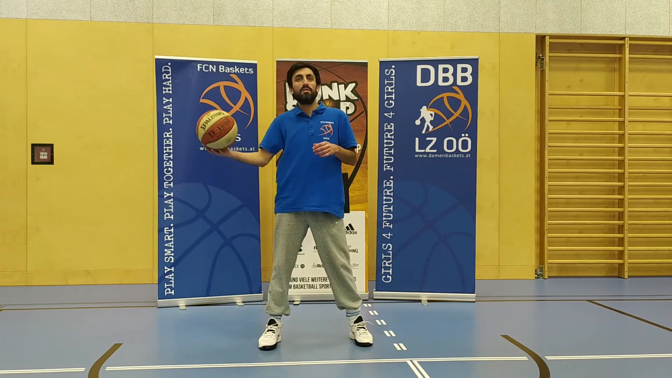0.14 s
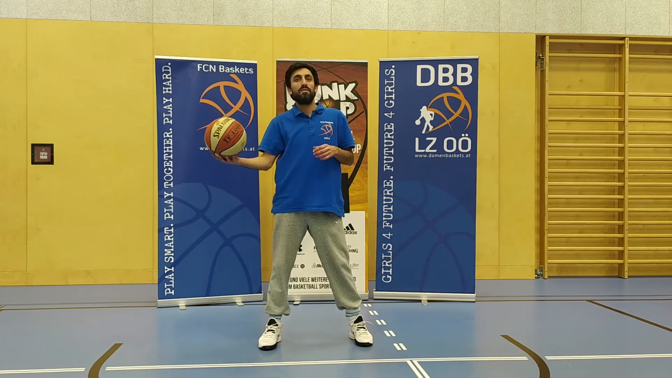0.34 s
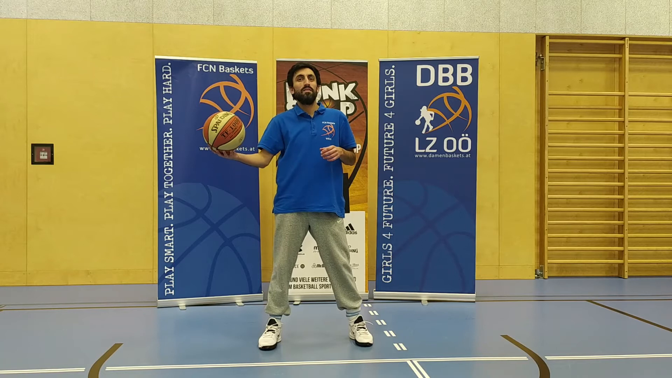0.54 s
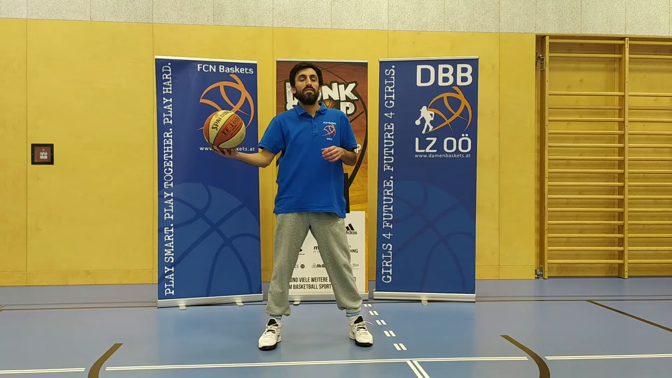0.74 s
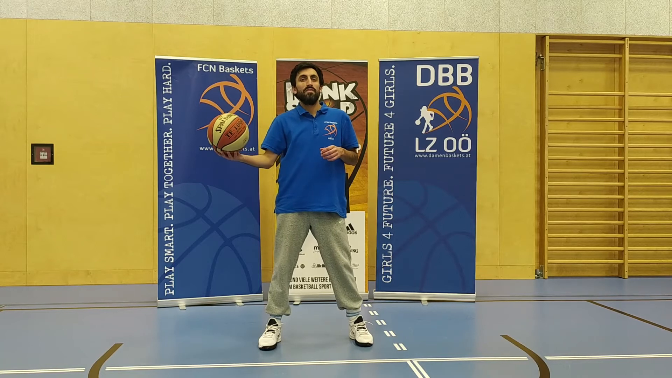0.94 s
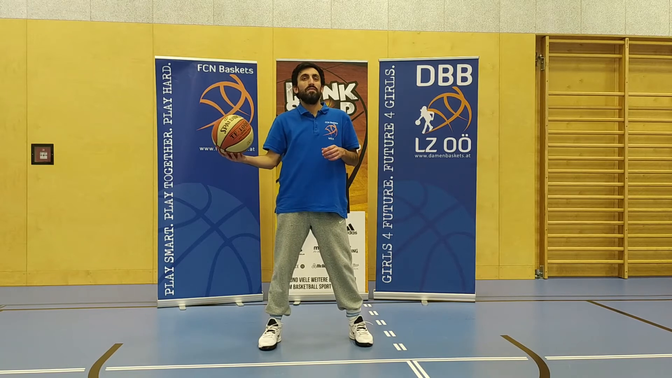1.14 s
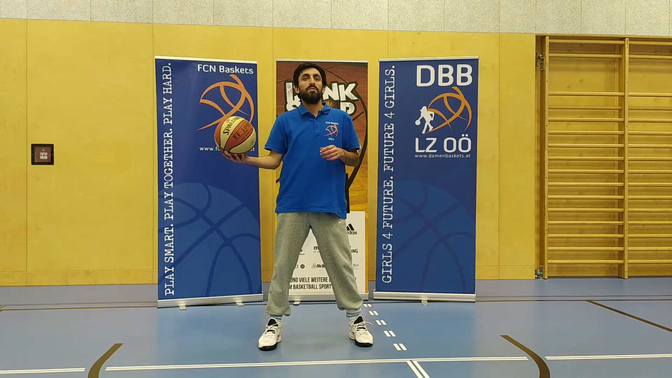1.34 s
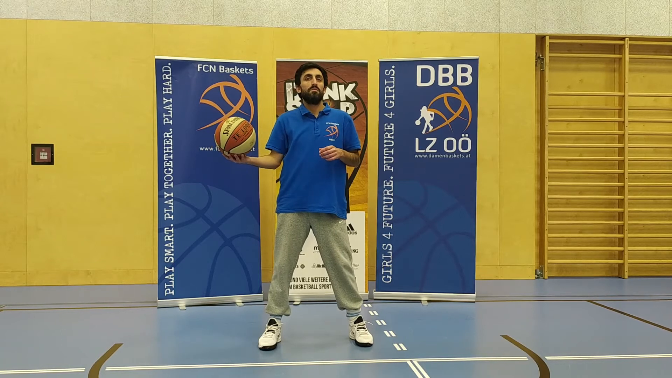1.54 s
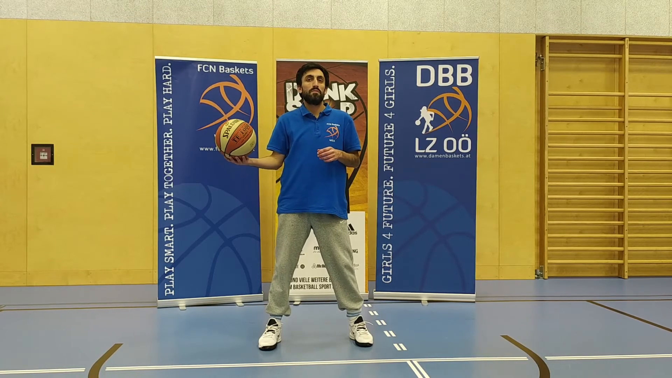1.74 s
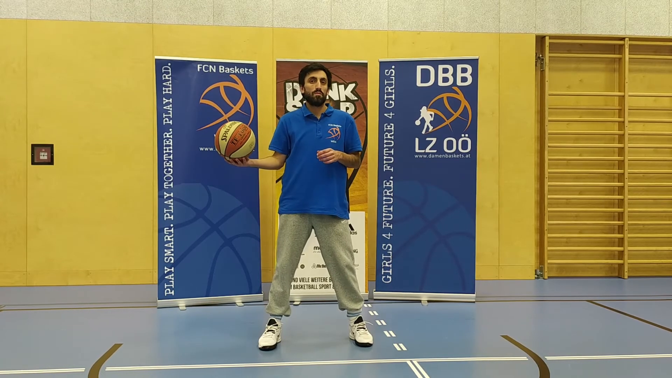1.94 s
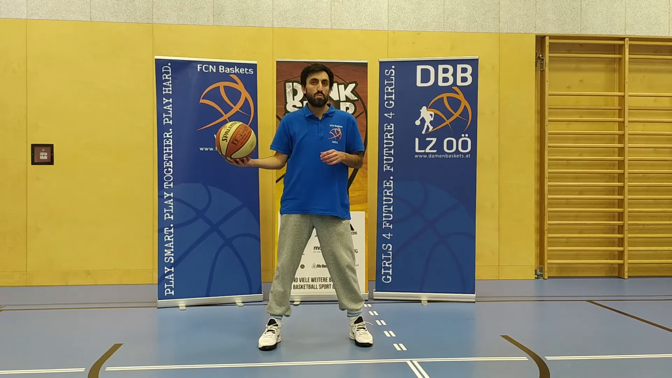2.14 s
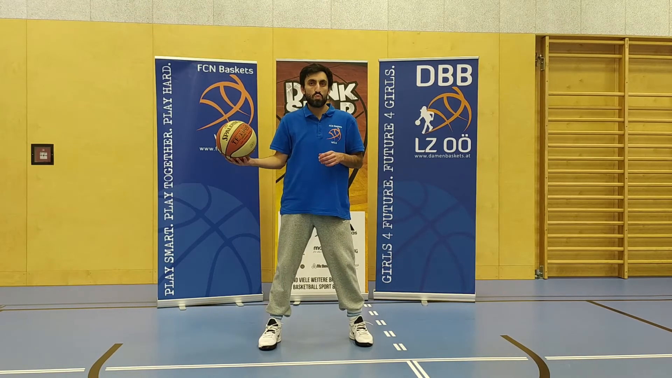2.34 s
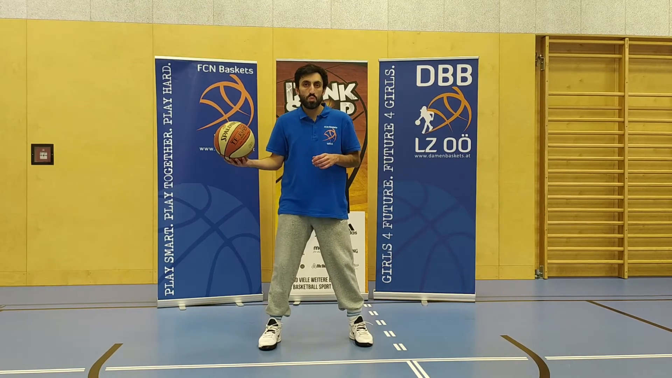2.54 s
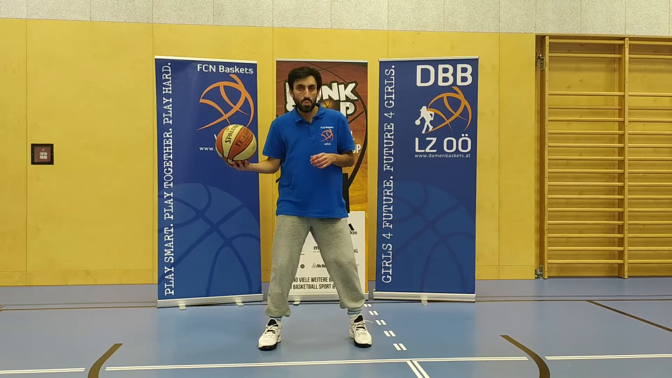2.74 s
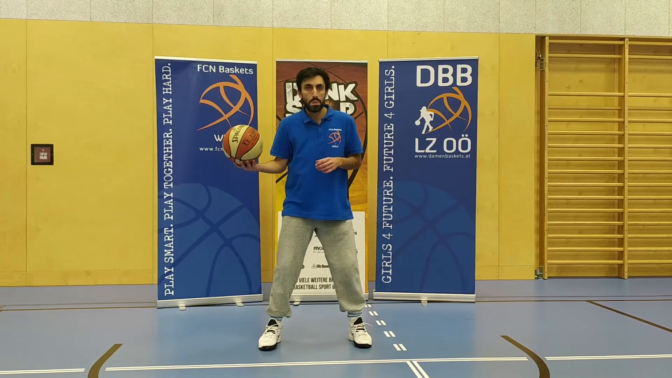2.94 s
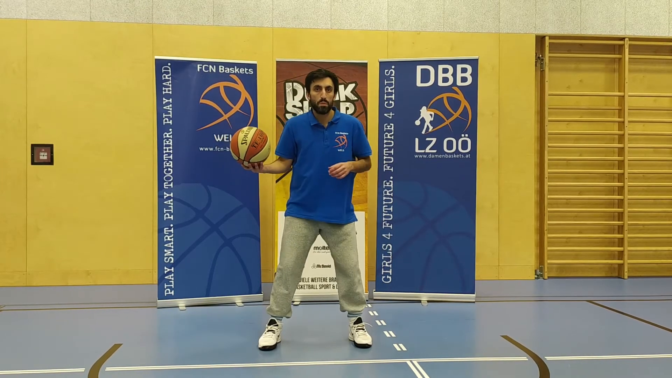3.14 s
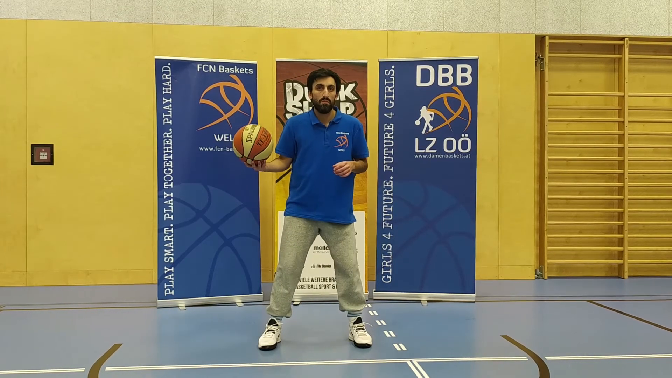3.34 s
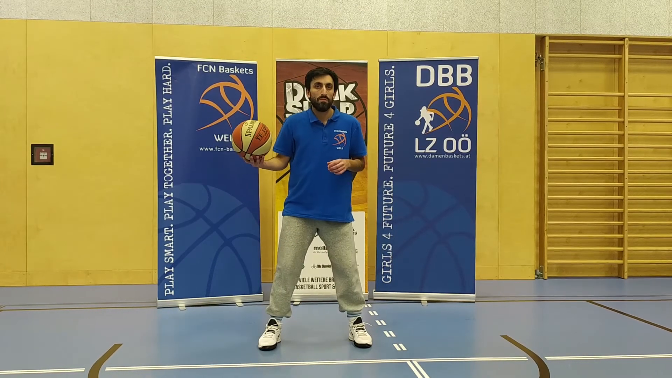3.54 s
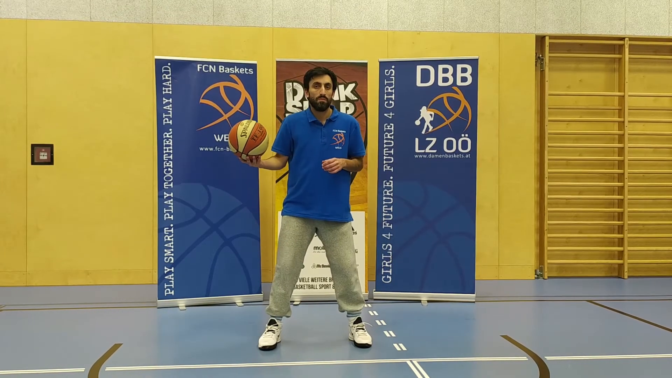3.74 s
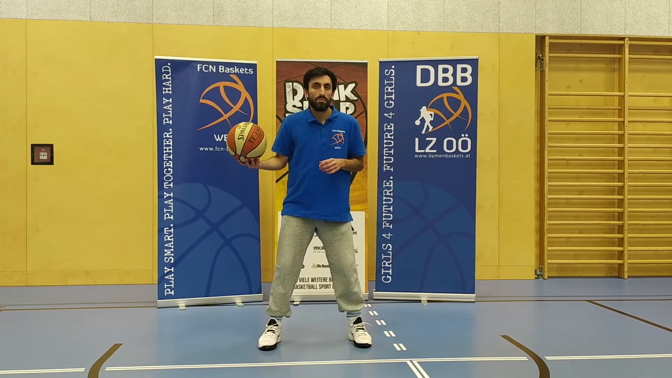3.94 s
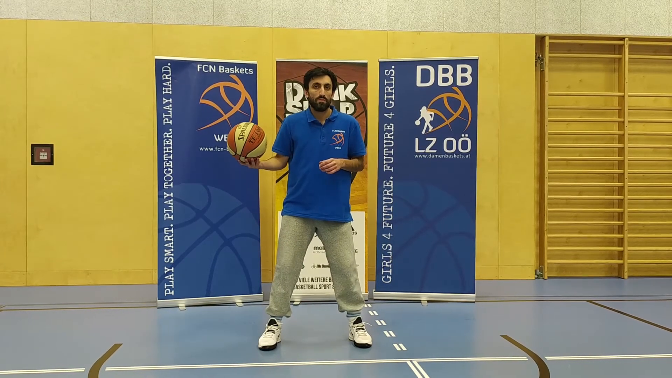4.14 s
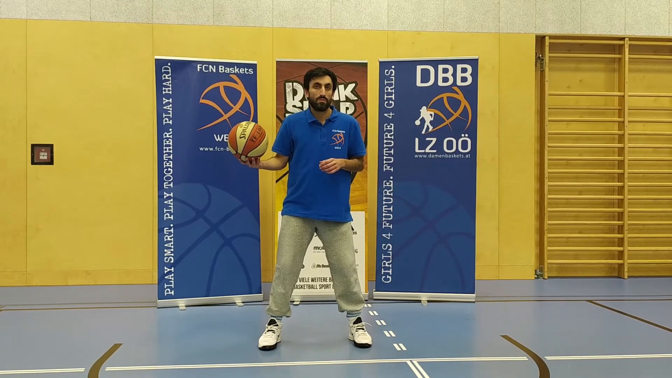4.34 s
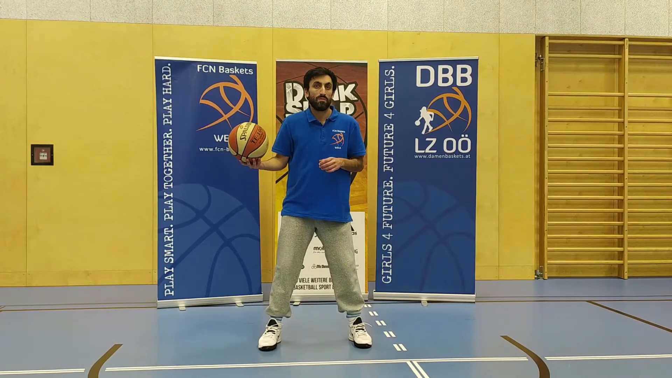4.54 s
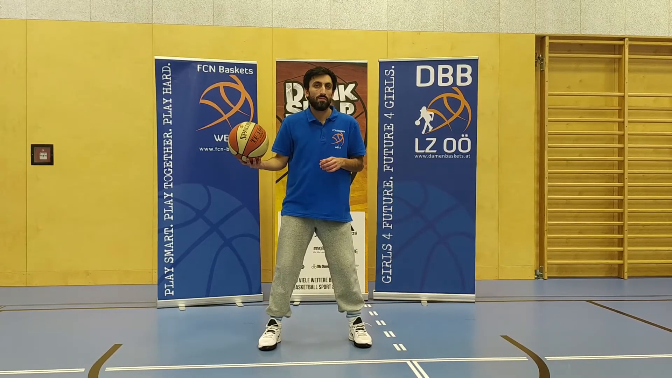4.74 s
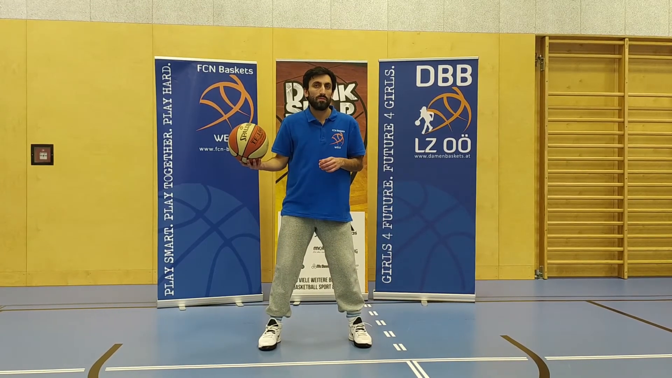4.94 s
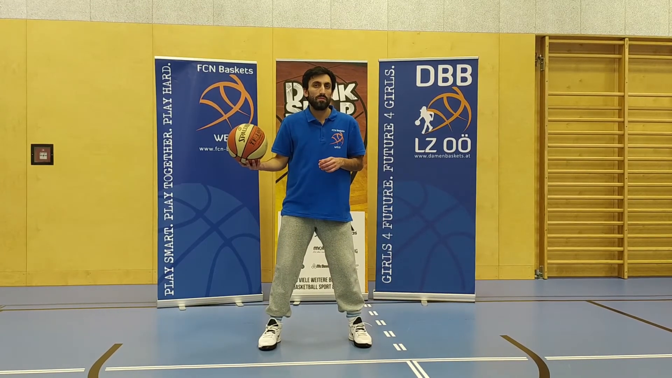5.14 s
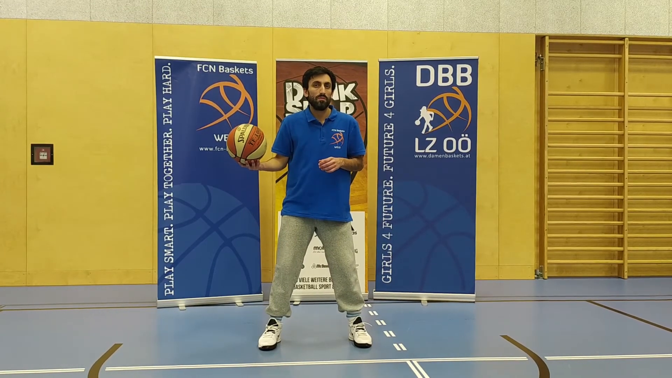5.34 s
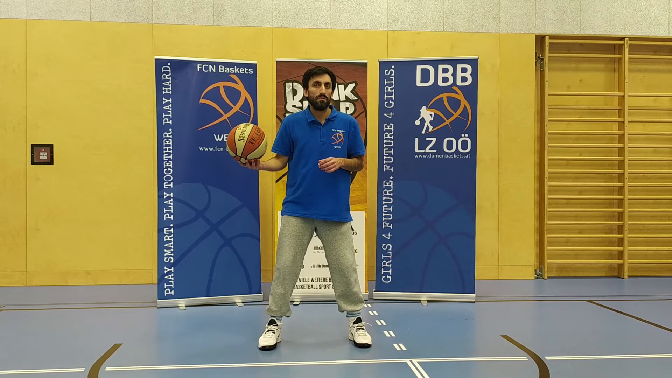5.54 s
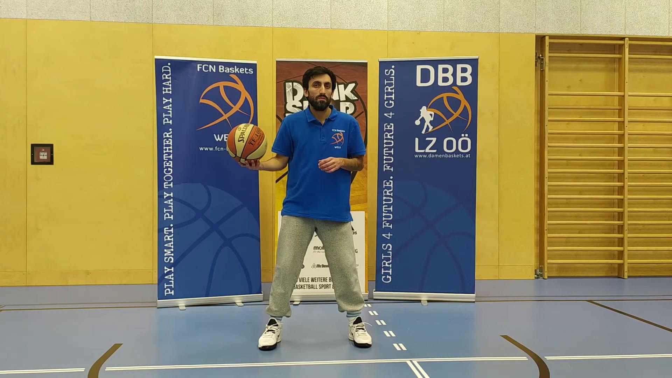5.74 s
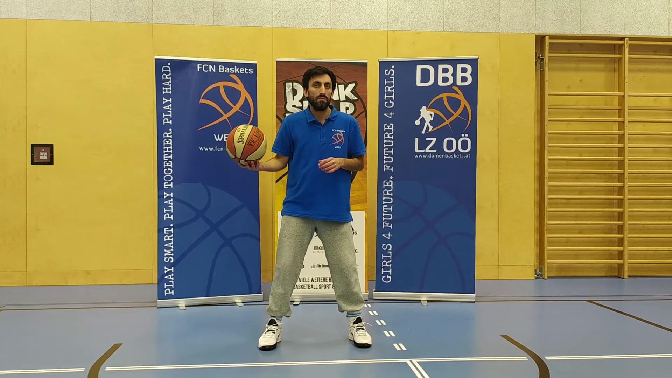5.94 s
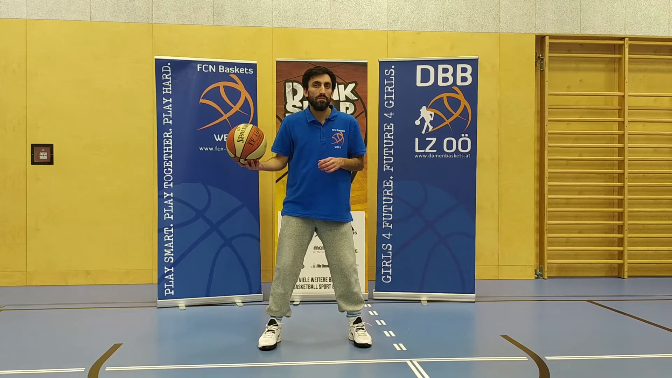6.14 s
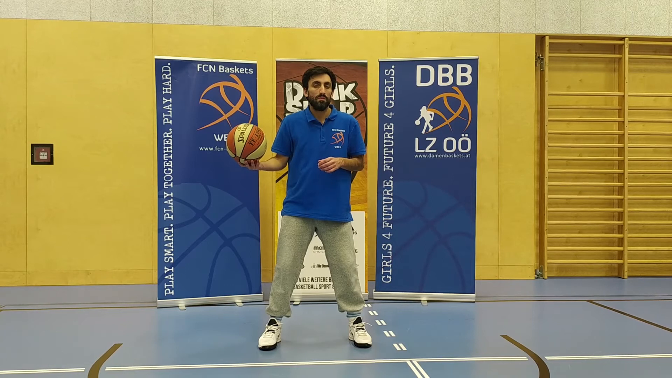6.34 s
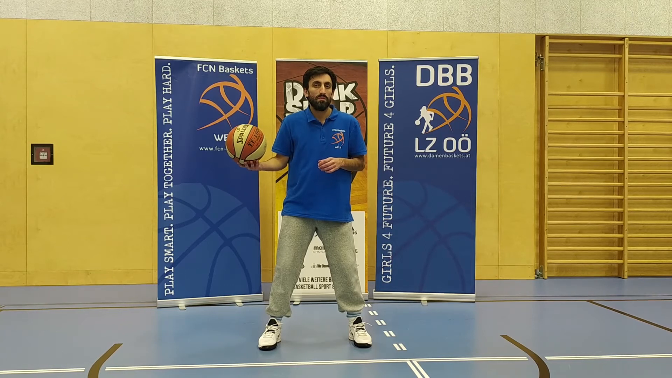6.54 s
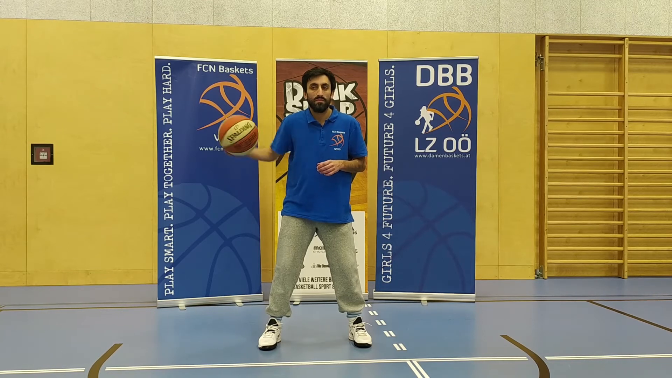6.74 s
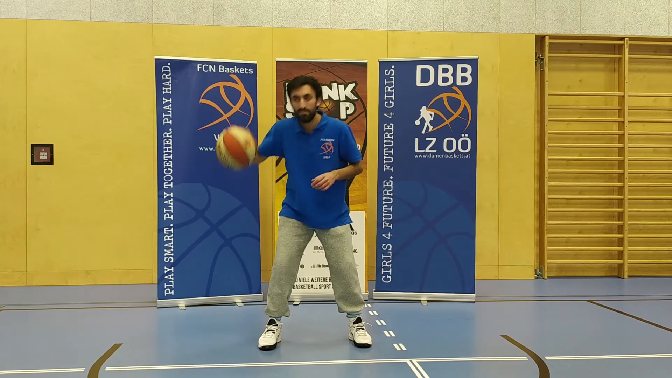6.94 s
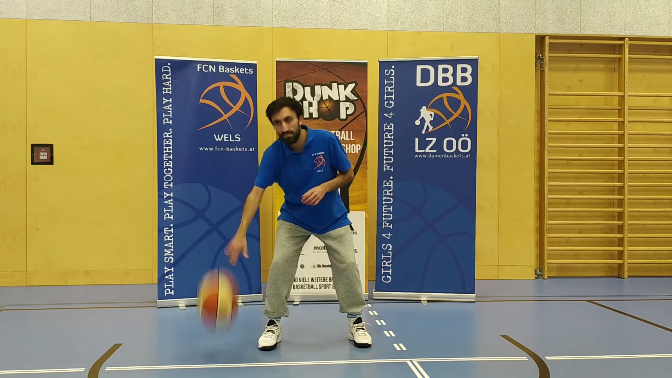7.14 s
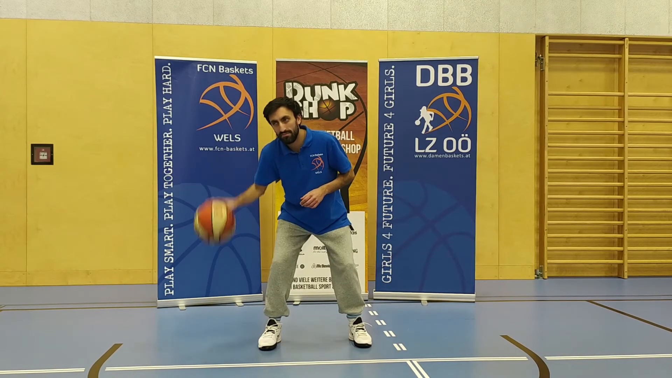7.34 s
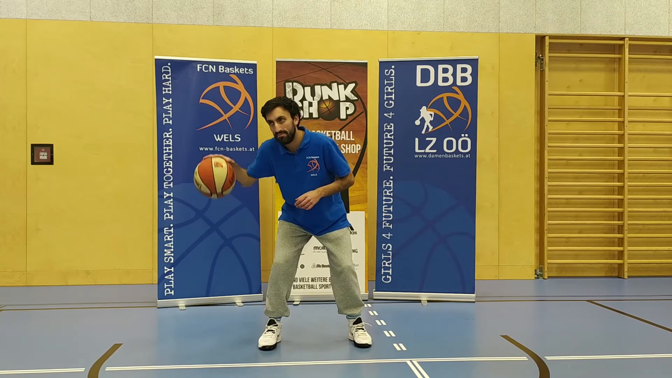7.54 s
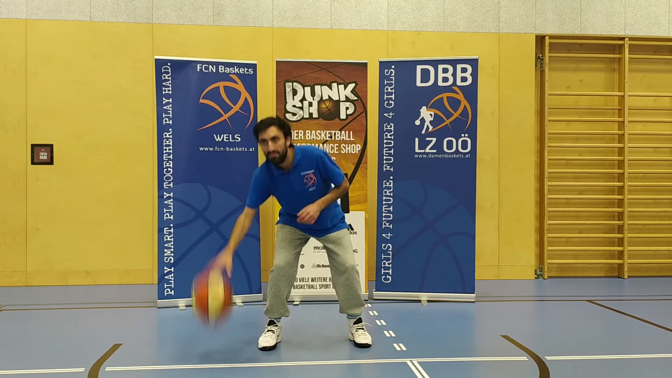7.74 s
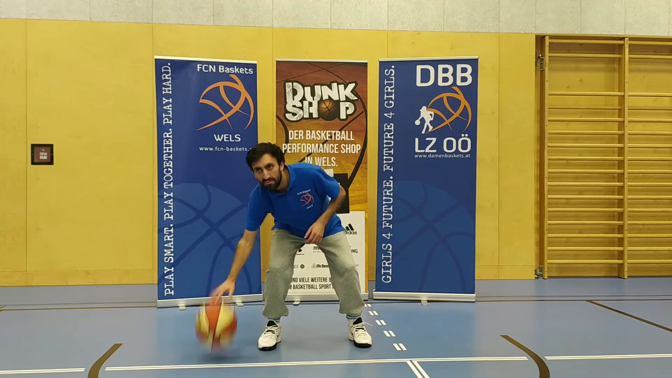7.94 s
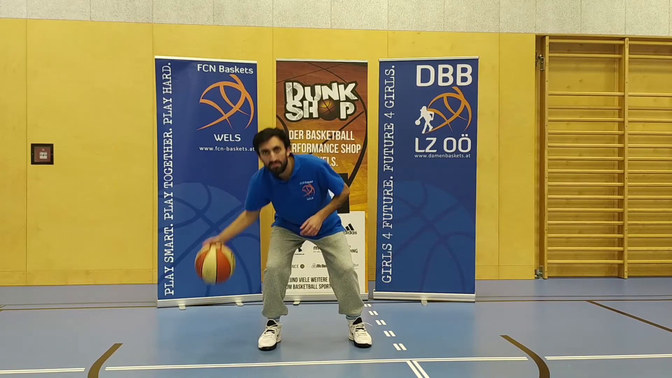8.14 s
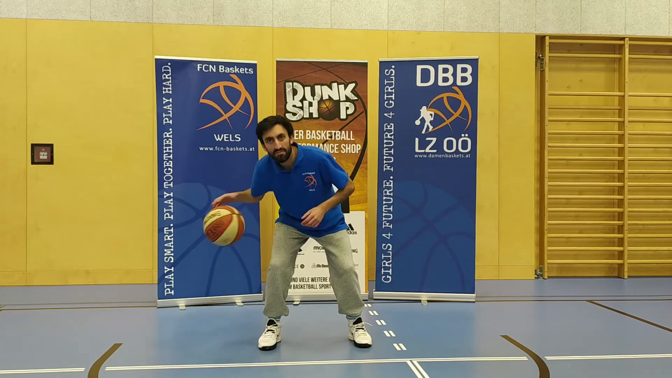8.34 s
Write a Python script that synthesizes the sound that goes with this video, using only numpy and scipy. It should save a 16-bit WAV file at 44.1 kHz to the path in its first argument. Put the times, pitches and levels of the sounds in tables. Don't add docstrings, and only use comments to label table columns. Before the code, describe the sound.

Sharp, hollow hand claps crack close by in a big sports hall, echoing long, then a basketball bounces three times on the wooden floor.

```python
import sys
import numpy as np
from scipy import signal
from scipy.fft import rfft, irfft
from scipy.io import wavfile

SR = 44100
rng = np.random.default_rng(int(sys.argv[2]) if len(sys.argv) > 2 else 0)


def level_to_linear(level):
    exponent = np.asarray(level, float) / 20
    return 10 ** exponent


def store_wav(level_fs):
    pcm = np.round(np.clip(np.atleast_2d(level_fs), -1, 1) * 32767)
    wavfile.write(sys.argv[1], SR, pcm.T.astype(np.int16))


N = 374409
BEFORE = SR // 2


def at_hz(table, hz):
    centre, *columns = np.transpose(table)
    return [np.interp(np.log(hz), np.log(centre), column) for column in columns]


def ring(x, hz, t60):
    radius, turn = level_to_linear(-60 / (t60 * SR)), 2 * np.pi * hz / SR
    return signal.lfilter([0, np.sin(turn)], [1, -2 * radius * np.cos(turn), radius * radius], x)


def band(x, low_hz, high_hz):
    return signal.sosfilt(signal.butter(2, [low_hz, high_hz], "band", fs=SR, output="sos"), x)


def lowpass(x, order, hz):
    return signal.lfilter(*signal.butter(order, hz, fs=SR), x)


def bell(t, middle, spread):
    return np.exp(-.5 * ((t - middle) / spread) ** 2)


def lean(db):
    return level_to_linear(db * np.array([[.5], [-.5]]))


def add(track, s, sound):
    at = BEFORE + round(s * SR)
    track[..., at:at + sound.shape[-1]] += sound[..., :track.shape[-1] - at]


def puff(t, rise, fall):
    shape = (t / rise) ** 2 * np.exp(-t / fall)
    return shape / shape.max()


def even(burst, shape):
    for _ in range(3):
        spectrum = rfft(burst * shape)
        burst = irfft(spectrum / (np.abs(spectrum) + 1e-9))
    shaped = burst * shape
    return shaped * np.linalg.norm(shape) / np.linalg.norm(shaped, axis=-1, keepdims=True)


def smack(palm_hz):
    t, noise = np.arange(1024) / SR, rng.standard_normal((4, 1024))
    crack = band(noise[2] + .9 * noise[:2], 4500, 11800) * puff(t, rise=.001, fall=.0007)
    crack_left, crack_right = level_to_linear(-9) * crack

    later = np.maximum(t - .0018, 0)
    t60 = .012 * (2000 / palm_hz) ** .73
    turns = palm_hz * later * (0.856 + 60 * later)
    cavity = np.sin(2 * np.pi * turns) * puff(later, rise=.001, fall=.0001 + t60 / 28)
    cup = np.sin(2 * np.pi * 905 * later) * puff(later, rise=.001, fall=.0015)
    thud = np.sin(2 * np.pi * 270 * later) * np.exp(-later / .0064)

    flesh_shape = np.sqrt(puff(t, rise=.001, fall=.0012))
    flesh = band(even(noise[3] + .5 * noise[:2], flesh_shape), 300, 2600)
    left, right = cavity + level_to_linear(.5) * flesh + level_to_linear(-13.5) * cup + level_to_linear(-15.5) * thud
    return np.array([crack_left + left, np.roll(crack_right, 1) + np.roll(right, 2)])


# start in seconds, peak in dB, palm cavity in Hz, # upper edge of the
# dull part sent into the hall in Hz, level sent into the hall in dB.
SMACKS = [(1.2190, -2, 2170, 2630, 3), (1.7559, -1, 1890, 2140, 4), (1.9472, -3, 2306, 2300, -2.5),
          (2.6654, -2, 1957, 2000, 6), (3.2723, -3, 2000, 2300, 1.5), (3.4403, -2, 1900, 2180, -2.5),
          (4.1521, -6, 1930, 2300, -0.4), (4.7064, -0.5, 2546, 3000, 4.5), (4.8951, -3.5, 2506, 2780, -5.5),
          (5.2276, -3, 2006, 2230, 3.5), (5.573, -1.2, 2530, 2930, 0.5), (5.9022, -3, 1775, 2450, 3),
          (6.2415, -2.5, 2220, 2890, 1)]
# delay in seconds, left in dB, right in dB, dulled above in Hz.
SMACK_ECHOES = [(.0048, -21, -7, 11300), (0.0098, -35.5, -41.5, 5340), (.0320, -17.5, -23.5, 10510),
                (0.062, -28, -38.5, 10500), (0.0757, -30, -66.5, 4000), (.1120, -47.5, -40, 3000),
                (.1240, -26.5, -43.5, 3000)]


def smacks(near, hall_send):
    click = np.eye(1, 2048)[0]
    for s, peak_db, palm_hz, top_hz, send_db in SMACKS:
        sound = level_to_linear(peak_db) * smack(palm_hz)
        add(near, s - .0027, echoes(sound, SMACK_ECHOES, smear=.0005))
        cavity = level_to_linear(-30.5) * ring(click, .9 * top_hz, t60=.005)
        dull = signal.sosfilt(signal.butter(10, top_hz, fs=SR, output="sos"), click)
        crackle = level_to_linear(-38.5) * band(click, 2600, 16000)
        add(hall_send, s, level_to_linear(send_db - 30.5) * (dull + cavity) + crackle)


# frequency in Hz, level in dB, t60 in seconds.
BALL_MODES = [(102, -3, 0.051), (172, -12.5, 0.13), (242, -7, 0.043), (307, -6, 0.012), (486, -10.5, 0.058),
              (870, 3, 0.0038), (1176, -3.5, 0.024), (1795, 8, 0.0031), (2775, 1, 0.0071)]


def bounce(thump_db, crack_db):
    t, noise = np.arange(SR // 4) / SR, rng.standard_normal((2, SR // 4))
    body = 0
    for k, (hz, level_db, t60) in enumerate(BALL_MODES):
        mode_db = level_db + rng.normal(0, 3.36) + thump_db * (hz < 400)
        gain = level_to_linear(mode_db) * lean(at_hz(HALL, hz)[3])
        onset = 1 - np.exp(-t * hz / .25)
        mode = onset * level_to_linear(-60 * t / t60) * np.sin(2 * np.pi * hz * t)
        body = body + (-1) ** (k + 1) * gain * mode
    rattle = level_to_linear(-13) * band(noise[::-1], 440, 3250) * np.exp(-t / .036)
    tick = level_to_linear(crack_db) * band(noise, 5500, 12500) * puff(t, rise=.001, fall=.00078)
    left, right = body + rattle + tick
    return np.array([np.roll(left, 4), right])


# frequency in Hz, level in dB, t60 in seconds.
FLOOR_MODES = [(57.4, -7, 0.87), (70.8, -10, 0.36)]


def boom():
    t, in_step = np.arange(SR // 2) / SR, .026
    modes = 0
    for hz, db, t60 in FLOOR_MODES:
        modes = modes + level_to_linear(db - 60 * t / t60) * np.sin(2 * np.pi * hz * (t - in_step))
    return modes * (1 - np.exp(-(t / .013) ** 2)) * level_to_linear(np.array([[2.0], [-2.5]]))


# start in seconds, peak in dB, thump in dB re peak,
# crack in dB re peak, level sent into the hall in dB.
BOUNCES = [
    (7.278, -12.5, 3.5, -6, -3),
    (7.883, -16, 4.5, -2.5, -4),
    (8.065, -17.5, 2.5, 0, -3),
]
# delay in seconds, left in dB, right in dB, dulled above in Hz.
BOUNCE_ECHOES = [(0.0104, -7, -8.5, 5300), (0.04, -17.5, -11.5, 3000), (0.043, -17, -16, 3000),
                 (.0570, -9.5, -36, 7090), (0.08, -15, -15, 3500)]


def bounces(near, hall_send):
    click = np.eye(1, 2048)[0]
    ball_air = click + .017 * ring(click, 500, t60=.029) + .015 * ring(click, 1208, t60=.018)
    for s, peak_db, thump_db, crack_db, send_db in BOUNCES:
        sound = level_to_linear(peak_db) * bounce(thump_db, crack_db)
        add(near, s + .00083, echoes(sound, BOUNCE_ECHOES, smear=.078))
        add(near, s, level_to_linear(peak_db + thump_db) * boom())
        add(hall_send, s, level_to_linear(peak_db + send_db + 11) * ball_air)
    add(hall_send, -.35, level_to_linear(-10) * ball_air)


def echoes(x, table, smear):
    size = x.shape[1]
    out = np.pad(x, ((0, 0), (0, SR // 6)))
    t = np.arange(256) / SR
    for s, left_db, right_db, dull_hz in table:
        scatter = rng.normal(.91, 1, (2, len(t))) * np.exp(-t / (smear * s))
        scatter /= np.linalg.norm(scatter, axis=1, keepdims=True)
        dull = lowpass(x, 2, dull_hz)
        low = lowpass(dull, 1, 400)
        echo = .59 * low + signal.fftconvolve(dull - low, scatter, axes=1)[:, :size]
        start = round(s * SR)
        out[:, start:start + size] += level_to_linear(np.array([[left_db], [right_db]])) * echo
    return out


# frequency in Hz, t60 in seconds, build-up in seconds,
# left-right likeness (1 = same), left-right difference in dB.
HALL = [(61, 1.7, 0.034, 0.93, 5.5), (152, 2.5, 0.098, 0.7, 3.5), (285.8, 2.98, 0.04, 0.95, 5.5),
        (680, 2.54, 0.13, 0.015, 3), (1360, 2.62, 0.008, 0.0, 2.5), (2300, 1.93, 0.019, 0.15, -1),
        (2850, 1.3, 0.023, 0.22, -0.9), (3500, 1.39, 0.02, 0.088, 0), (5800, 0.78, 0.042, 0, -2.5),
        (10700, 0.52, 0.0098, 0.08, -3), (14850, 0.45, .03, 0.0081, -21)]


def stereo_bands(size):
    white = rng.standard_normal((2, 2, size))
    edges = 28 * 2 ** np.arange(0, 9.4, 1 / 3)
    for k, (low, high) in enumerate(zip(edges, edges[1:])):
        mid, side = band(white[k % 2], low, high)
        hz = np.sqrt(low * high)
        alike, lean_db = at_hz(HALL, hz)[2:]
        alike = np.clip(alike, -1, 1)
        pair = np.sqrt(1 + alike) * mid + np.sqrt(1 - alike) * side * [[1], [-1]]
        yield hz, pair * lean(lean_db)


# delay in seconds, spread in seconds, added gain.
FAR_WALL = (0.12, 0.012, 0.23)


def hall(clicks, colour):
    t, reply = np.arange(5 * SR // 2) / SR, 0
    late = np.maximum(t - .012, 0)
    for hz, pair in stereo_bands(len(t)):
        t60, build = at_hz(HALL, hz)[:2]
        decay = level_to_linear(at_hz(colour, hz)[0] - 60 * t / t60)
        reply = reply + pair * decay * (1 - np.exp(-(late / build) ** 2))
    far_s, spread, gain = FAR_WALL
    reply = reply * (1 + gain * bell(t, far_s, spread))
    reply = reply * np.minimum(2 * (t[-1] - t), 1)
    return signal.fftconvolve(clicks[None], reply, axes=1)[:, :len(clicks)]


# frequency in Hz, level in dB per Hz.
SMACK_TAIL = [(120, -46), (200, -20), (236, -30), (289, -14.5), (883, 2.5), (1140, 3), (1560, 1),
              (2090, 3.5), (3490, 0.5), (10100, -1.5), (14100, -52), (16000, -71.5)]
# frequency in Hz, level in dB per Hz.
BOUNCE_TAIL = [(18, -41), (30, -1), (44, -16), (64, 2), (103, -10.5), (161, -9), (204, -12), (295, -21),
               (394, -35), (512, -22), (889, -25), (2170, -26.5), (4780, -38), (9970, -36.5), (16000, -99)]


def tails(hands_send, ball_send):
    return lowpass(hall(hands_send, SMACK_TAIL) + hall(ball_send, BOUNCE_TAIL), 4, 11300)


# middle in seconds, spread in seconds, level in dB.
RUSTLE = [
    (0.738, 0.05, -72),
    (0.95, 0.058, -74),
    (1.19, 0.055, -77.5),
    (6.721, 0.13, -70.5),
]


def rustle():
    t = np.arange(N) / SR
    level = sum(level_to_linear(db) * bell(t, s, spread) for s, spread, db in RUSTLE)
    grains = band(rng.standard_normal((2, N)) * rng.exponential(1, N), 7500, 12000)
    return level_to_linear(-4) * level * grains / grains.std()


# frequency in Hz, level in dB per Hz.
AIR = [(18, -34), (30, -3.5), (49, -20), (116, -13), (150, -11), (171, -16), (211, -7), (247, -17),
       (281, -11.5), (364, -30.5), (415, -22.5), (1520, -43), (3680, -51), (9640, -53), (15000, -69.5)]
# frequency in Hz, width in Hz, level in dB.
DUCTS = [(1080, 900.0, -71), (151, 3.3, -60), (221.4, 8.3, -68.5), (497, 32, -70.5)]


def ventilation():
    broad = sum(level_to_linear(at_hz(AIR, hz)[0]) * pair for hz, pair in stereo_bands(N))
    out = level_to_linear(-57) * broad / broad.std()
    for hz, width, level_db in DUCTS:
        t60 = np.log(1000) / (np.pi * width)
        tone = ring(ring(rng.standard_normal(N + SR), hz, t60), hz, t60)[SR:]
        out += level_to_linear(level_db) * tone / tone.std() * lean(3)
    return out


def scene():
    near, (hands_send, ball_send) = np.zeros((2, 2, BEFORE + N))
    smacks(near, hands_send)
    bounces(near, ball_send)
    blows = near + tails(hands_send, ball_send)
    return blows[:, BEFORE:] + rustle() + ventilation()


# start in seconds, sag left in dB, sag right in dB.
SAGS = [(1.2194, -11.5, -18.5), (1.7549, -31.5, -27), (1.9466, -41.5, -32.5), (2.6655, -23, -39.5),
        (3.2717, -17, -21), (3.4397, -25.5, -31), (4.1502, -24.5, -28), (4.7057, -19, -20),
        (4.898, -11.5, -24), (5.2253, -23, -24), (5.5718, -23.5, -24.5), (5.9009, -19, -18),
        (6.2407, -23.5, -19)]


def overload():
    t, out = np.arange(SR) / SR, np.zeros((2, BEFORE + N))
    u = 12.86 * t
    step = np.exp(-u) * (1 - 2 * u + u * u / 2) * (1 - np.exp(-t / .002))
    ringing = .95 * np.exp(-t / .014) * np.sin(2 * np.pi * 166 * t)
    for s, *db in SAGS:
        sag_db = np.reshape(db, (2, 1))
        sag = level_to_linear(sag_db) * (ringing - 2.1 * np.maximum(step, 0))
        swell = level_to_linear(1.41 * sag_db + 5) * -5.2 * np.minimum(step, 0)
        add(out, s + .0032, sag + swell)
    return out[:, BEFORE:]


def top_cut(x):
    return signal.sosfilt(signal.butter(12, 16820, fs=SR, output="sos"), x)


# frequency in Hz, width in Hz, gain added on top.
CAPSULE = (9600, 2200, .8)


def record(dry):
    over_db = np.maximum(20 * np.log10(np.abs(dry).max(axis=0) + 1e-9) + 9.2, 0)
    release = 201 * np.arange(N) / SR
    held = np.maximum.accumulate(over_db + release) - release
    duck_db = signal.lfilter([.004], [1, .004 - 1], held)
    hz, width, gain = CAPSULE
    heard = dry + gain * signal.lfilter(*signal.iirpeak(hz, hz / width, fs=SR), dry)
    loud = lowpass(heard, 4, 12500) * level_to_linear(-.7 * duck_db) + overload()
    flat = .93 * loud / (1 + loud ** 4) ** (1 / 4)
    return top_cut(flat)


dry = scene()
out = record(dry)
store_wav(out)
```